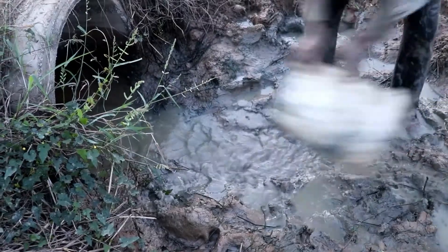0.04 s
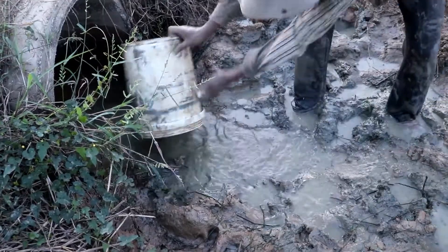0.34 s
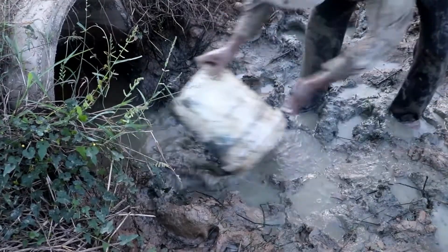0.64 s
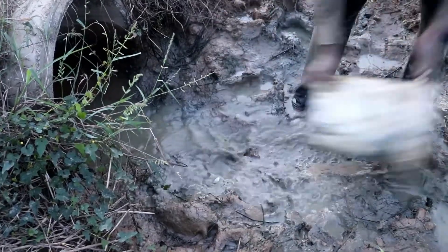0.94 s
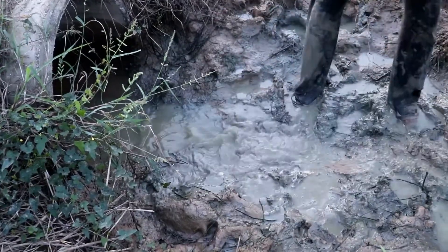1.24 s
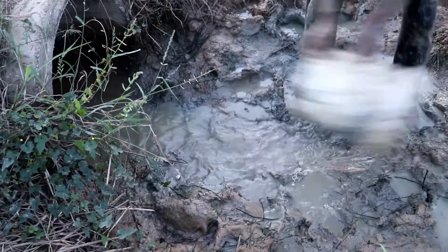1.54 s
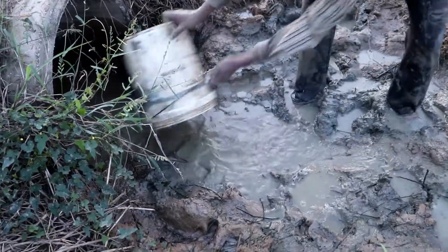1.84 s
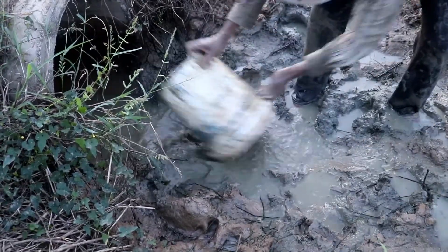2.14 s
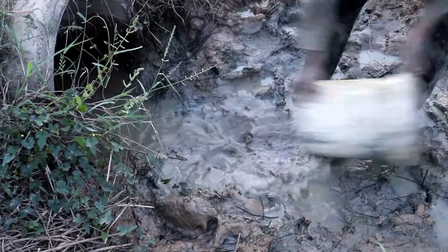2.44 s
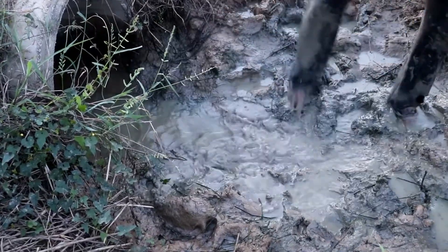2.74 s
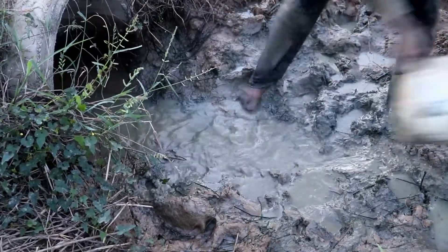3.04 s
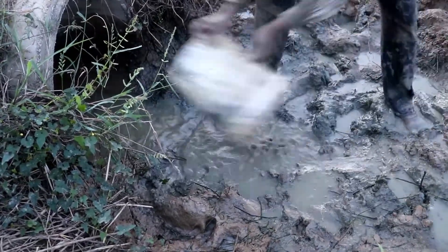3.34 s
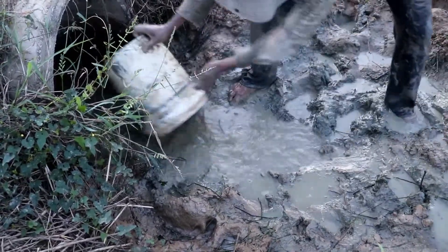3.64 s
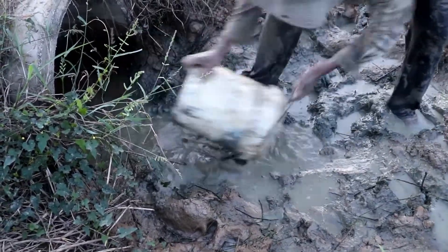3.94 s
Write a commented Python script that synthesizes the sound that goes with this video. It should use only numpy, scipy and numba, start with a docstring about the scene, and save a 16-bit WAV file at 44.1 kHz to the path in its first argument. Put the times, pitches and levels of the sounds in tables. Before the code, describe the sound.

Water is bailed from a muddy pool with a bucket, heard close by outdoors. A splash lands to the right, then scooping sloshes, gurgles and squelches follow. This happens three times, over faint low rumble and hiss.

```python
"""Outdoors at a muddy pool, bailed with a plastic bucket. Over faint rumble and hiss, the bucket
pushes and stirs the water, which sloshes and drips. Wet mud ticks and squelches, trapped air gulps,
and slaps ring small air pockets. Three loads are thrown off to the right; each lands as spray, then
heavy water. Splashes are filtered random clicks (drops) and dying sines (bubbles)."""
import sys
import numpy as np
from scipy import signal
from scipy.fft import rfft, irfft, next_fast_len
from scipy.io import wavfile
from scipy.ndimage import uniform_filter1d
from numba import njit

SR = 44100
rng = np.random.default_rng(int(sys.argv[2]) if len(sys.argv) > 2 else 0)


def to_wav(s):
    """Save 16-bit WAV."""
    ch = np.atleast_2d(s).T  # columns
    pcm = np.round(np.clip(ch, -1, 1) * 32767)  # PCM
    wavfile.write(sys.argv[1], SR, pcm.astype(np.int16))


N = 176400
T = np.arange(N) / SR

# Spectral shapes (f/Hz, gain/dB)
AIR_SPECTRUM = [(20, -21), (45, -8), (62, 9.5), (85, 0.5), (115, 4), (170, -9), (350, -13), (1000, -27),
                (3000, -21), (5000, -24.5), (8000, -22), (15500, -41)]
CHURN_SPECTRUM = [(40, -35), (110, -10.5), (200, 2), (330, -9), (550, -4), (900, -21.5), (3000, -51)]
WASH_SPECTRUM = [(200, -29), (1500, -1.5), (3000, 3), (4200, -1.5), (7000, -5), (10000, -12), (15500, -18)]
SLOSH_SPECTRUM = [(50, -24.5), (180, 1.5), (400, -8), (700, -7.5), (1200, -2.5), (1900, -3), (3000, 2),
                  (4200, -7), (6800, -2.5), (9000, -13.5), (11500, -20), (15500, -20)]
SQUELCH_SPECTRUM = [(100, -34), (900, -16.5), (1700, 2.5), (2500, 1), (3300, -1), (4000, -7.5), (4750, 4.5),
                    (5400, -2.5), (6900, 0), (8500, 1.5), (10000, -11), (15500, -14)]
SLAP_SPECTRUM = [(60, -5), (200, 6), (1000, -0.5), (2900, 1), (3800, -4), (7500, -0.5), (11000, -7.5),
                 (15500, -21)]
MIST_SPECTRUM = [(1000, -40), (6000, -8), (10000, 8), (15500, -13)]
SPRAY_SPECTRUM = [(100, -53), (700, -19), (1500, -18), (2800, 5.5), (4000, -1.5), (7500, -0.5),
                  (10000, -10.5), (12000, -12), (15500, -13)]
BULK_SPECTRUM = [(50, -27), (150, -9.5), (350, -6.5), (750, -4.5), (1250, -5.5), (2800, 2.5), (3700, -1.5),
                 (7000, -6.5), (10000, -11.5), (15500, -42)]
# Left-over-right curves, weighted in place() (f/Hz, gain/dB)
POOL_BALANCE = [(100, 1), (1500, 1), (3000, -2), (3900, -0.5), (4600, 1), (6500, 2), (10000, 1),
                (13000, -2.5)]
LANDING_BALANCE = [(100, 0), (600, 2.5), (1400, -3.5), (2900, -14.5), (3900, -7), (4800, -5.5),
                   (6200, -4.5), (8300, 0.5), (10500, 0.5), (13000, -0.5)]
# Bank scatter re direct sound (f/Hz, level/dB)
BANK_SCATTER = [(100, -30), (500, -13), (1500, -0.5), (3500, 0.5), (8000, -3.5), (13000, 10)]
# Bucket strokes (peak t/s, churn level/dB, wash level/dB, rise/s, decay/s)
PUSHES = [(.635, -61.5, -59, 0.042, 0.013), (0.918, -55.5, -46.5, 0.092, 0.11),
          (1.27, -59, -66, 0.072, 0.042), (2.0, -59.5, -75, 0.018, 0.022), (2.42, -54, -50.5, 0.068, 0.028),
          (2.56, -64.5, -64, 0.046, 0.23), (3.93, -60.5, -62, 0.059, 0.039)]
# Water stirred by the bucket and running off it (t/s, level/dB)
STIRRING = [(0, -71), (.46, -54), (.57, -56), (.68, -51), (.82, -50), (.92, -53), (.99, -42.5), (1.03, -57),
            (1.19, -59), (1.24, -50), (1.30, -53.5), (1.38, -68.5), (1.5, -69), (1.9, -77), (1.99, -51),
            (2.06, -56), (2.16, -54), (2.25, -51), (2.32, -54), (2.41, -41.5), (2.46, -49.5), (2.55, -55),
            (2.66, -55.5), (2.8, -61.5), (2.88, -61.5), (2.97, -72), (3.08, -59.5), (3.64, -64),
            (3.71, -67), (3.82, -65), (3.88, -51), (3.93, -52), (4, -55.5)]
# Mud cracks (t/s, level/dB, decay/s, treble tilt/(dB/oct))
SQUELCHES = [(.531, -51.5, 0.0027, 1), (0.8403, -47, 0.0017, 2), (1.057, -48, 0.0053, 12),
             (2.262, -47, 0.0037, -3), (2.419, -47.5, 0.0022, 4), (2.861, -51.5, .002, 3),
             (3.022, -42.5, 0.0012, 4.5), (3.030, -44, 0.0027, -2.5), (3.034, -36, 0.0049, 2),
             (3.0464, -40, 0.0056, 1.5), (3.0515, -35.5, 0.001, 3), (3.131, -45, .003, 5),
             (3.733, -55, 0.013, -10), (3.742, -49, 0.0066, -9.5), (3.750, -47, 0.0077, -10)]
# Trapped air and ringing bubbles (t/s, level/dB, f/Hz, glide/(oct/s), rise/s, decay/s)
GULPS = [(0.529, -43, 538, -10, 0.00098, 0.0067), (0.615, -46, 182, 1.5, 0.0082, 0.017),
         (0.646, -54, 1620, -11.5, 0.0071, 0.016), (.70, -48, 1153, 2, .004, 0.0091),
         (.743, -47, 514, 2.5, 0.02, 0.02), (.775, -51.5, 1070, -4.5, 0.0054, 0.013),
         (1.165, -37, 370, -17, 0.004, 0.0046), (1.172, -44.5, 200, 4.5, 0.006, 0.019),
         (2.186, -37.5, 194.6, 1, 0.013, 0.016), (2.188, -43, 111, 1, 0.0093, 0.024),
         (2.199, -40, 964, -0.5, 0.0062, 0.0078), (2.204, -41, 537, -1, 0.0071, 0.0053),
         (2.372, -44.5, 188.5, 2.5, 0.0092, 0.026), (2.412, -38, 270.6, 2, 0.0083, 0.0084),
         (2.722, -39, 344, -1, 0.004, 0.0026), (2.726, -47.5, 201, 8, 0.0036, 0.012),
         (3.741, -44.5, 6900, -4, .002, .006), (3.753, -52.5, 1500, 3, 0.004, 0.019),
         (3.91, -51.5, 523, 2.5, 0.0072, 0.024), (3.915, -45.5, 125, -3.5, 0.0063, 0.014)]
# Slaps and plops (t/s, level/dB, centre f/Hz, width/oct, splatter decay/s, side: 0 pool, 1 landing)
SLAPS = [(0.0474, -37, 2000, 2.5, 0.0048, 0.68), (.105, -35.5, 3080, 0.2, 0.0037, 1),
         (.229, -44.5, 2010, 0.17, 0.0033, 1), (0.303, -38.5, 7240, 0.61, 0.0014, 1),
         (.419, -45, 2150, 0.8, 0.0035, 1), (.520, -42.5, 1380, 0.48, 0.0064, 0.083),
         (.627, -43, 1100, 0.75, 0.011, 0), (.840, -31, 1610, 0.76, 0.01, 0),
         (0.87, -43.5, 1320, 0.71, 0.0057, 0.025), (.986, -34, 1330, 0.28, 0.0026, 0.2),
         (1.089, -47.5, 1110, 0.32, 0.0036, 0.73), (1.164, -37.5, 1160, 0.97, 0.0028, 0.34),
         (1.67, -44, 1300, 0.3, 0.0082, 0.43), (1.793, -34, 2130, 0.84, 0.0078, 1),
         (1.811, -34.5, 1570, 0.62, 0.0014, 0.56), (2.178, -41, 1800, 0.14, 0.02, 0),
         (2.213, -41, 690, 1.4, 0.0066, 0.07), (2.238, -41.5, 2150, 0.44, 0.0083, 0),
         (2.419, -45, 1300, 4.1, 0.0056, 0.25), (2.586, -46, 1320, 0.53, 0.0094, 0.7),
         (2.628, -43.5, 1150, 0.79, 0.017, 0.68), (2.720, -43, 1060, 0.61, 0.0044, 0.47),
         (2.728, -44.5, 1310, 1.07, .004, 0.4), (2.846, -47.5, 1470, 0.54, 0.011, 1),
         (2.793, -54.5, 1200, 1.7, 0.0043, 0.42), (3.159, -45, 1310, 1.06, 0.0021, 0.96),
         (3.388, -49, 1330, 2.5, .008, 1)]
# Arrival within a load (f/Hz, lateness: 0 first spray, 1 bulk)
LATENESS = [(700, 0.96), (3000, 0.49)]
# Loads (spray t/s, bulk t/s, end t/s, spray gain/dB, bulk start gain/dB, bulk end gain/dB)
THROWS = [(-.02, 0.084, 0.32, -1.8, 2, -1.5), (1.555, 1.712, 1.824, 0.78, -1, 3),
          (3.118, 3.186, 3.383, 0, 0.5, -3)]


def amp(db):
    return 10 ** (np.asarray(db) / 20)


def unit_rms(x):
    return x / np.sqrt(np.mean(x ** 2) + 1e-20)


def burst(x, db, span_s=0.007):
    """Scales x to the energy of span_s at an rms level of db."""
    return x / np.linalg.norm(x) * np.sqrt(span_s * SR) * amp(db)


def lookup(table, hz):
    """Interpolates over log frequency."""
    f, value = np.transpose(table)
    return np.interp(np.log(hz + 1), np.log(f + 1), value)


def add(mix, at_s, sound):
    part = mix[:, max(round(at_s * SR), 0):][:, :sound.shape[1]]
    part += sound[:, :part.shape[1]]


def colour(x, db_at, size=2048):
    """Minimum-phase filter with gain db_at(hz)."""
    log_gain = np.log(amp(db_at(abs(np.fft.fftfreq(size, 1 / SR)))))
    taps = np.fft.ifft(np.exp(np.conj(signal.hilbert(log_gain)))).real
    return signal.fftconvolve(x, taps[:size // 2])[:len(x)]


def patter(spectrum, impacts):
    """Impacts filtered by a spectrum, at unit rms."""
    return unit_rms(colour(impacts, lambda hz: lookup(spectrum, hz)))


def clicks(per_s, spread_db, size=N):
    """Random impacts, mostly small, a few large."""
    hit = rng.random(size) < per_s / SR
    strength = np.minimum(rng.exponential(1, size), 4)
    return hit * rng.choice([-1, 1], size) * amp(spread_db * strength)


def blow(t, decay_s, crackle_db):
    """One click, then a dying crackle of droplets."""
    crackle = clicks(per_s=5400, spread_db=0.5, size=len(t)) * np.exp(-t / decay_s)
    return (t == 0) + amp(crackle_db) * crackle / (np.linalg.norm(crackle) + 1e-12)


@njit
def pings(rows, life_cycles, bend, size):
    """Sum of dying, gliding sines, one per row."""
    out = np.zeros(size)
    for first, cycles_per_sample, height, glide in rows:
        for k in range(min(int(5 * life_cycles / cycles_per_sample), size - int(first))):
            cycles = k * cycles_per_sample
            age = cycles / life_cycles
            envelope = height * min(cycles * 2, 1) * np.exp(-age)
            out[int(first) + k] += envelope * np.sin(2 * np.pi * cycles * (1 + bend * glide * age))
    return out


def bubbles(count, centre_hz, spread_oct, life_cycles, bend, spread_db):
    """Small bubbles ping at random times, pitches and glides."""
    first = rng.random(count) * N
    strength = np.minimum(rng.exponential(1, count), 3)
    pitch, glide = rng.standard_normal((2, count))
    hz = np.clip(centre_hz * 2 ** (spread_oct * pitch), 150, 12000)
    height = amp(spread_db * strength) * np.sqrt(hz)
    rows = np.column_stack([first, hz / SR, height, glide])
    return unit_rms(pings(rows, float(life_cycles), bend, N))


def clumps(per_s, depth_db):
    """Random gain: water arrives in uneven lumps."""
    knots = rng.standard_normal(2000)
    return amp(depth_db * np.interp(T * per_s, np.arange(len(knots)), knots))


def shower(t, start_s, end_s, rise_s, fall_db_per_s):
    """Envelope: swells until start_s, holds until end_s, dies away."""
    return np.exp(np.minimum(t - start_s, 0) / rise_s) * amp(-fall_db_per_s * np.maximum(t - end_s, 0))


def scatter(x, decay_s=0.0052, size=128):
    """Diffuse stereo halo, ever changing as each drop lands somewhere else."""
    power = abs(signal.stft(x, nperseg=size)[2]) ** 2
    pole = np.exp(-size / SR / decay_s)
    halo = np.sqrt(signal.lfilter([0, 1 - pole], [1, -pole], power) + 1e-30)
    re, im = rng.standard_normal((2, 2) + halo.shape)
    return signal.istft(halo * (re + 1j * im), nperseg=size)[1][:, :len(x)]


def place(x, side, scatter_db=0, pad=512):
    """Stereo image between pool (side 0) and landing place (1), with bank scatter."""
    n = next_fast_len(len(x) + pad)
    hz = np.fft.rfftfreq(n, 1 / SR)
    halo = scatter(np.pad(x, (pad, 0)))[:, pad:]
    wet = amp(lookup(BANK_SCATTER, hz) + scatter_db)
    heard = (rfft(x, n) + wet * rfft(halo, n)) / np.sqrt(1 + wet ** 2)
    lean = amp((1.5 - side) * lookup(POOL_BALANCE, hz) + side * lookup(LANDING_BALANCE, hz))
    left_lag_s = (1 - side) * 33e-6 + side * 150e-6
    left = lean * np.exp(-2j * np.pi * hz * left_lag_s)
    pan = np.array([left, np.ones(len(hz))]) * np.sqrt(2 / (1 + lean ** 2))
    return irfft(heard * pan, n)[:, :len(x)]


def air(level_db=-65, widen_hz=1600):
    """Steady centred rumble under a wide, faint hiss."""
    hz = np.fft.rfftfreq(N, 1 / SR)
    mid, wide = rfft(rng.standard_normal((2, N)))
    wide *= (hz + 100) / (hz + 100 + widen_hz)
    spectrum = np.array([mid + wide, mid - wide]) * amp(lookup(AIR_SPECTRUM, hz))
    return amp(level_db) * unit_rms(irfft(spectrum, N))


def pushes():
    """The bucket shoves water aside: low churn and fine wash."""
    churn = patter(CHURN_SPECTRUM, clicks(per_s=400, spread_db=2.5))
    wash = patter(WASH_SPECTRUM, clicks(per_s=2500, spread_db=7.5))
    out = np.zeros(N)
    for peak_s, churn_db, wash_db, rise_s, decay_s in PUSHES:
        envelope = np.exp(-np.maximum((peak_s - T) / rise_s, (T - peak_s) / decay_s))
        out += (amp(churn_db) * churn + amp(wash_db) * wash) * envelope
    return place(out, side=0.28)


def mud_ticks(follow=0.43):
    """Draining mud ticks on, only partly following the stirring."""
    impacts = clicks(per_s=70, spread_db=3)
    ticks = colour(impacts, lambda hz: (lookup(SQUELCH_SPECTRUM, hz) + lookup(MIST_SPECTRUM, hz)) / 2)
    level_db = -45.5 + follow * np.interp(T, *np.transpose(STIRRING))
    return place(unit_rms(ticks) * amp(level_db), side=0, scatter_db=-2.5)


def slosh():
    """Stirred water breaks into drips and ringing bubbles."""
    drips = unit_rms(clicks(per_s=3000, spread_db=3))
    ringing = bubbles(1100, centre_hz=1450, spread_oct=0.6, life_cycles=11, bend=0.0278, spread_db=2)
    fizz = (drips + amp(-2.5) * ringing) * clumps(per_s=73, depth_db=1.87)
    level_db = np.interp(T, *np.transpose(STIRRING))
    return place(patter(SLOSH_SPECTRUM, fizz) * amp(level_db), side=0)


def squelches(size=6000):
    """Suction breaks: water and air squirt through mud in quick cracks."""
    out, t = np.zeros((2, N)), np.arange(size) / SR
    for at_s, db, decay_s, tilt in SQUELCHES:
        crackle = blow(t, decay_s, crackle_db=4)
        crack = colour(crackle, lambda hz: lookup(SQUELCH_SPECTRUM, hz) + tilt * np.log2(1 + hz / 1000))
        add(out, at_s, place(burst(crack, db), side=0, scatter_db=0.5))
    return out


def gulps(waver_depth=0.035, flutter_db=1.5, size=10000):
    """Air trapped by the bucket and under water rings in short, unsteady notes."""
    out, t = np.zeros((2, N)), np.arange(size) / SR
    for at_s, db, start_hz, oct_per_s, rise_s, decay_s in GULPS:
        waver, flutter = unit_rms(uniform_filter1d(rng.standard_normal((2, size)), 150))
        hz = start_hz * 2 ** (oct_per_s * t) * (1 + waver_depth * waver)
        envelope = np.minimum(t / rise_s, 1) * np.exp(-np.maximum(t - rise_s, 0) / decay_s)
        note = envelope * np.sin(2 * np.pi * np.cumsum(hz) / SR)
        add(out, at_s, place(amp(db + flutter_db * flutter) * note, side=0))
    return out


def slaps(size=6000):
    """A blow on wet mud briefly rings an air pocket and scatters droplets."""
    out, t = np.zeros((2, N)), np.arange(size) / SR
    for at_s, db, centre_hz, width_oct, decay_s, side in SLAPS:
        def splatter_db(hz):
            detune = np.log2((hz + 20) / centre_hz) / width_oct
            resonance = amp(-55.5 / 4 * np.log10(1 + detune ** 4))
            floor = amp(-19.5) * width_oct
            return 20 * np.log10(resonance + floor) + lookup(SLAP_SPECTRUM, hz)

        splatter = colour(blow(t, decay_s, crackle_db=4.5), splatter_db)
        swell_s = 0.56 / (centre_hz * width_oct)
        pocket = t / swell_s * np.exp(-t / swell_s) * np.sin(2 * np.pi * centre_hz * t)
        slap = burst(splatter, 0) + burst(pocket, -5) / (1 + width_oct ** 2)
        add(out, at_s, place(burst(slap, db), side, scatter_db=-2.5))
    return out


def throws(spray_rise_s=0.009, bulk_rise_s=0.014, size=256):
    """Mist and spray land first, then bigger, deeper lumps darken the splash; spatter lingers."""
    mist = patter(MIST_SPECTRUM, clicks(per_s=3000, spread_db=4))
    spray = patter(SPRAY_SPECTRUM, clicks(per_s=2200, spread_db=4.5))
    drops = unit_rms(clicks(per_s=3000, spread_db=5))
    plops = bubbles(4000, centre_hz=1530, spread_oct=1.034, life_cycles=2.1, bend=0.022, spread_db=1.5)
    lumps = (drops + amp(-6) * plops) * clumps(per_s=160, depth_db=1.3)
    hz, frame_s, bulk_bands = signal.stft(patter(BULK_SPECTRUM, lumps), SR, nperseg=size)
    plinks = bubbles(800, centre_hz=2490, spread_oct=0.563, life_cycles=4.3, bend=0.029, spread_db=6)
    spatter = patter(BULK_SPECTRUM, plinks)
    out = np.zeros(N)
    for spray_s, bulk_s, end_s, spray_db, start_db, end_db in THROWS:
        mist_gain = amp(-53.5 + spray_db) * shower(T, spray_s, spray_s, spray_rise_s, fall_db_per_s=81)
        spray_gain = amp(-47.5 + spray_db) * shower(T, spray_s, end_s, spray_rise_s, fall_db_per_s=92)
        spatter_gain = amp(-53) * shower(T, spray_s, end_s + 0.031, spray_rise_s, fall_db_per_s=116)
        arrival_s = spray_s + (bulk_s - spray_s) * lookup(LATENESS, hz)[:, None]
        band_gain = shower(frame_s, arrival_s, end_s, bulk_rise_s, fall_db_per_s=116)
        bulk = signal.istft(bulk_bands * band_gain, nperseg=size)[1][:N]
        bulk_gain = amp(-44 + np.interp(T, [bulk_s, end_s], [start_db, end_db]))
        swell = amp(np.interp(T, [spray_s, bulk_s], [-5, 0]))
        out += mist * mist_gain
        out += swell * (spray * spray_gain + spatter * spatter_gain + bulk * bulk_gain)
    return place(out, side=0.82)


def scene():
    return air() + pushes() + mud_ticks() + slosh() + squelches() + gulps() + slaps() + throws()


def record(dry):
    """Low-pass at 15.9 kHz."""
    taps = signal.firwin(511, 15900, window=("kaiser", 9), fs=SR)
    return signal.oaconvolve(dry, taps[None], "same")


dry = scene()
out = record(dry)
to_wav(out)
```